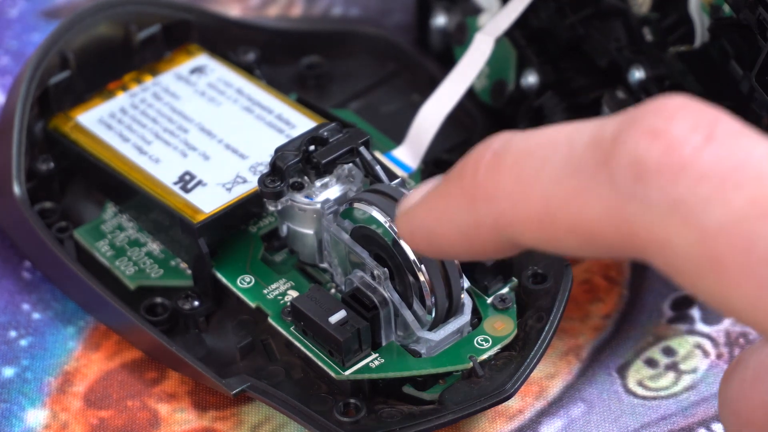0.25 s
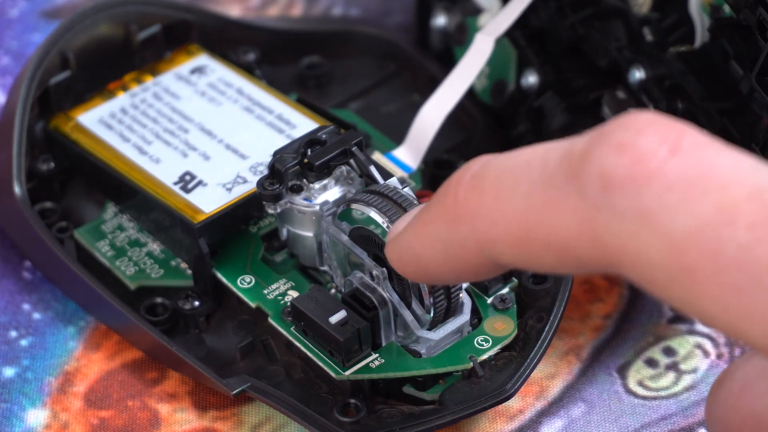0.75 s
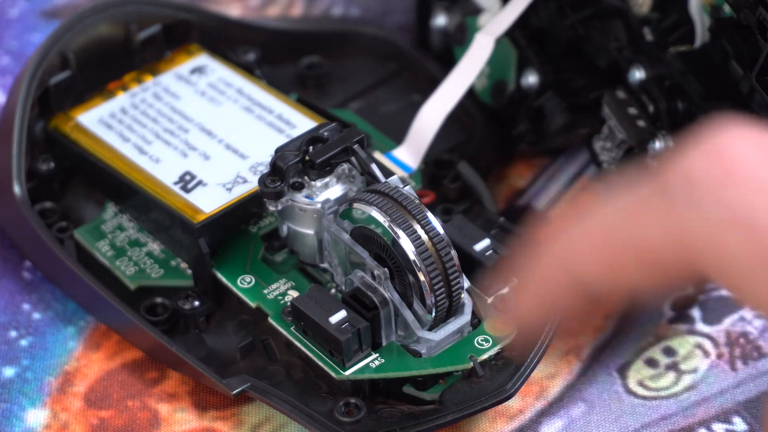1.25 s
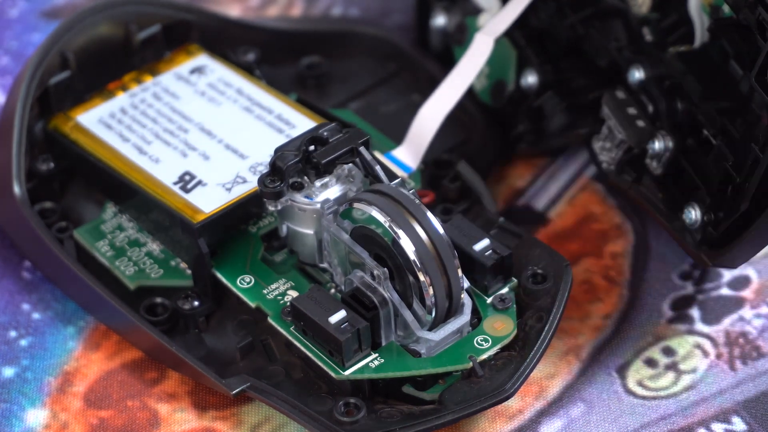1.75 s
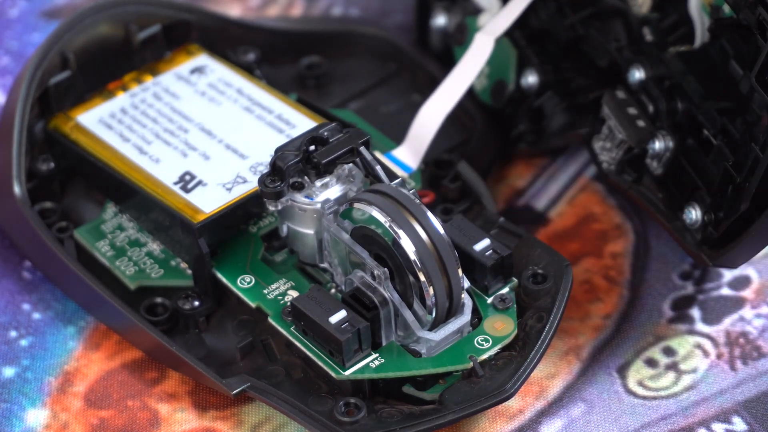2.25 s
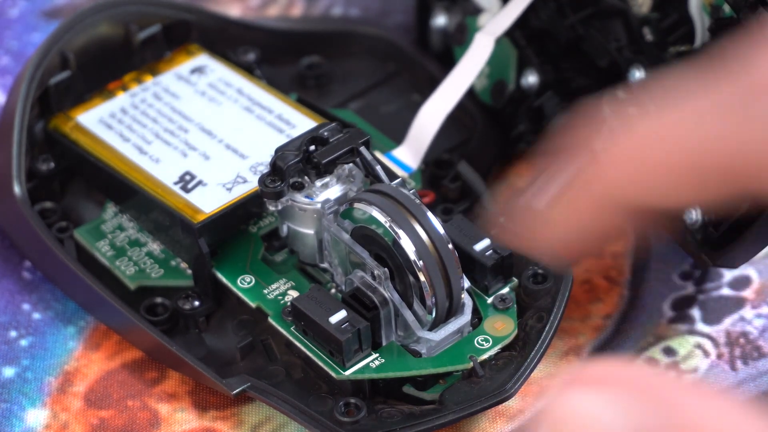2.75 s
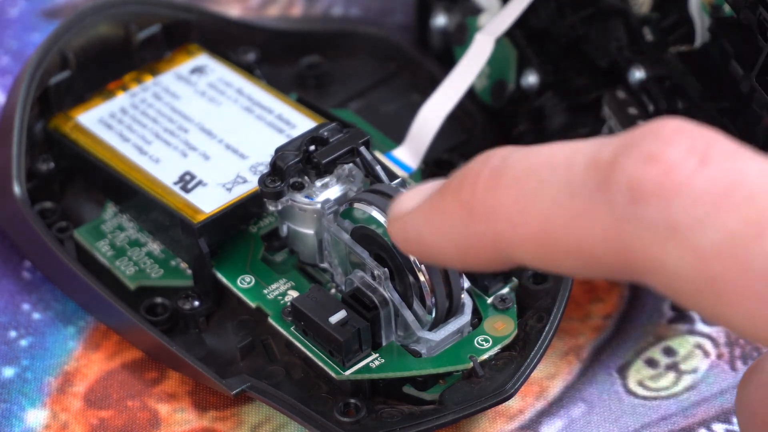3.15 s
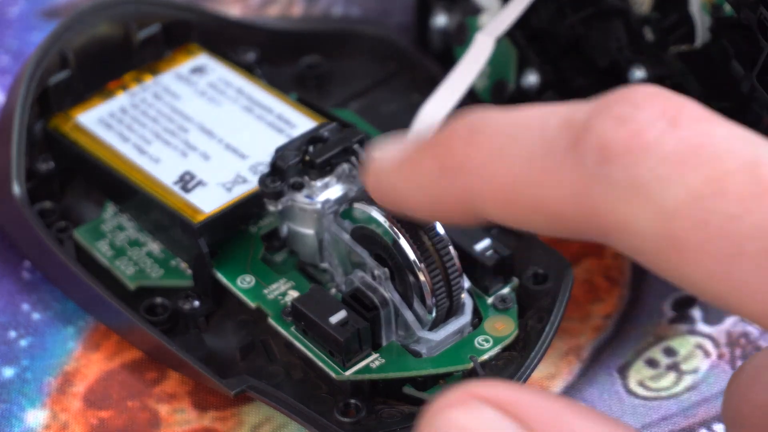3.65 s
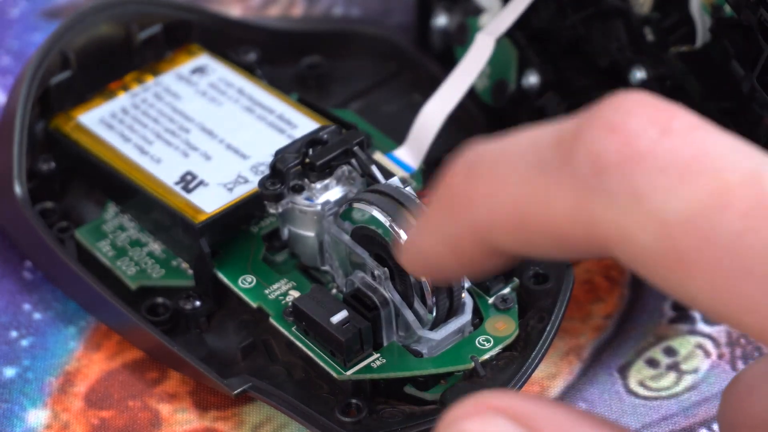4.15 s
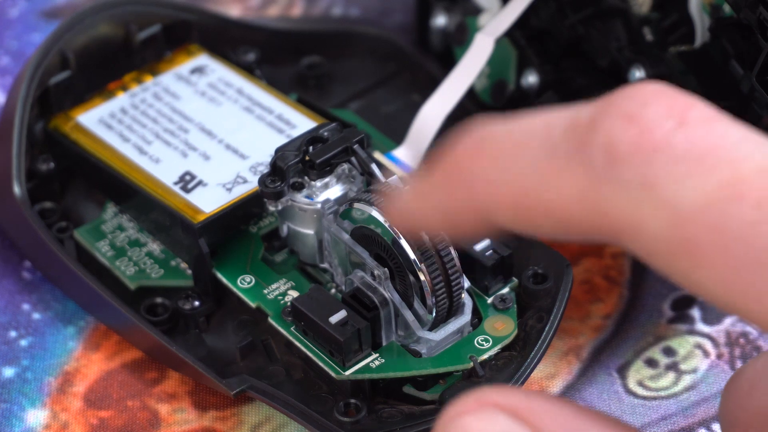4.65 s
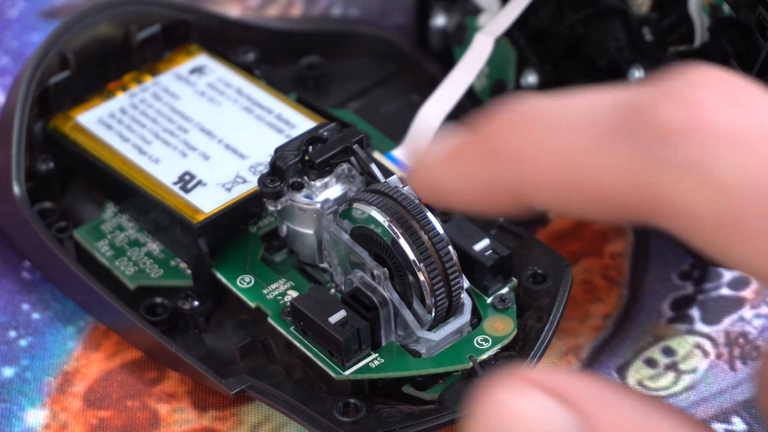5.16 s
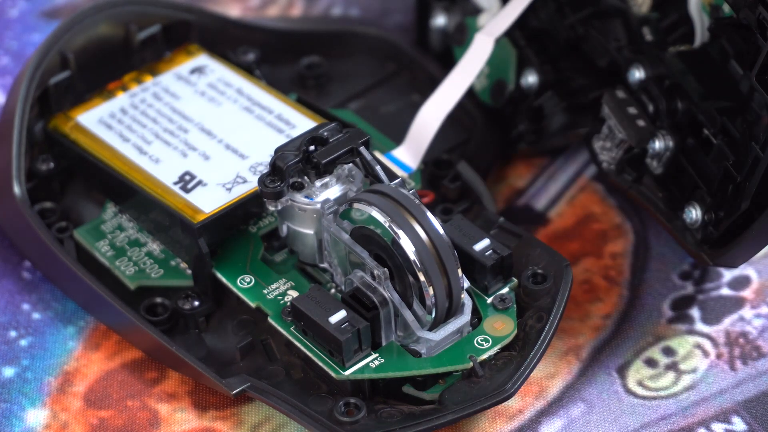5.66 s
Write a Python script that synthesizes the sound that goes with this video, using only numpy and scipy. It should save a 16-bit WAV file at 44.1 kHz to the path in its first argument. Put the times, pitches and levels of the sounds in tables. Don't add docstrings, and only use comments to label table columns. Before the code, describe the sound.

An opened mouse's wheel clicks sharply and unevenly, crisp plastic and metal with a tiny bright ring. Two hard snaps stand out; slow rolls tick in clusters between quick whirring flicks. The moving hand makes low dull bumps on the desk, cloth brushes faintly, and two woody knocks sound farther away. Close miking, small room, quiet hum, fan and hiss.

```python
import sys
import numpy as np
from scipy import signal
from scipy.fft import rfft, irfft
from scipy.io import wavfile

SR = 44100
rng = np.random.default_rng(int(sys.argv[2]) if len(sys.argv) > 2 else 0)


def decibels_to_gain(level_db):
    exponent = np.asarray(level_db, float) / 20
    return 10 ** exponent


def pcm_store(signal):
    levels = np.round(np.clip(np.atleast_2d(signal), -1, 1) * 32767)
    wavfile.write(sys.argv[1], SR, levels.astype(np.int16).T)


N = 261072

LIFT_HZ = 3030


def at_level(x, rms_db):
    return x * decibels_to_gain(rms_db) / np.sqrt(np.mean(x ** 2))


def coloured(spectrum):
    hz, db = np.transpose(spectrum)
    f_hz = np.maximum(np.arange(N // 2 + 1) * SR / N, 1)
    gain = decibels_to_gain(np.interp(np.log(f_hz), np.log(hz), db))
    return irfft(rfft(rng.standard_normal(N)) * gain, N)


def humming(resonances):
    f_hz = np.arange(N // 2 + 1) * SR / N
    noise = rfft(rng.standard_normal(N))
    out = 0
    for hz, width_hz, db in resonances:
        out = out + at_level(irfft(noise / (1 + (2 * (f_hz - hz) / width_hz) ** 2), N), db)
    return out


def ring(modes, count, length_s, scatter_db, detune, favour_hz=None, twist_rad=0):
    t = np.arange(int(length_s * SR)) / SR
    chance = rng.standard_normal((count, len(modes), 3))
    out = 0
    for k, (hz, db, t60_s) in enumerate(modes):
        db = db + scatter_db * chance[:, k, :1] - 60 * t / t60_s
        if favour_hz is not None:
            db = db - np.minimum(4 * ((hz - favour_hz) / 350) ** 2, 15)
        blow_hz = hz * (1 + detune * chance[:, k, 1:2])
        phase = 2 * np.pi * blow_hz * t + twist_rad * chance[:, k, 2:]
        out = out + (-1) ** k * decibels_to_gain(db) * np.sin(phase)
    return out


def place(times_s, sounds):
    out = np.zeros(N + sounds.shape[1])
    for s, sound in zip(times_s, sounds):
        start = int(s * SR)
        out[start:start + len(sound)] += sound
    return out[:N]


def room(x, gap_s, early):
    # (frequency [Hz], t60 [s])
    room_t60 = [(200, 0.26), (1500, 0.68), (3000, 0.63), (6500, 0.62), (11000, 0.32), (16000, 0.022)]
    hz, t60_s = np.transpose(room_t60)
    t = np.arange(SR // 2) / SR
    tail = 0
    for centre_hz in 125 * 2 ** np.arange(0, 7.2, .5):
        edges_hz = [centre_hz * .84, min(centre_hz * 1.19, 20000)]
        band = signal.butter(2, edges_hz, "band", fs=SR, output="sos")
        decay = decibels_to_gain(-60 * t / np.interp(np.log(centre_hz), np.log(hz), t60_s))
        tail = tail + signal.sosfilt(band, rng.standard_normal(len(t))) * decay
    tail = tail * (1 - np.exp(-t / gap_s)) * (1 + early * np.exp(-t / 0.013))
    return signal.fftconvolve(x, tail / np.sqrt(np.sum(tail ** 2)))[:N]


def microphone_hiss():
    # (frequency [Hz], level per Hz [dB])
    hiss_spectrum = [(35, -33), (60, 9), (142, -17), (287, -10), (882, -9), (3120, -10), (6740, -9),
                     (14900, -9), (16000, -17.5)]
    return at_level(coloured(hiss_spectrum), -67.5)


def room_air():
    # (frequency [Hz], level per Hz [dB])
    air_spectrum = [(20, -35), (35, -44), (64, -6), (90, -11.5), (300, -16), (600, -23), (1160, -27),
                    (2200, -30.5), (3500, -28), (4300, -34.5), (6000, -37.5), (10000, -38), (14400, -38),
                    (16000, -40)]
    return at_level(coloured(air_spectrum), -55.5)


def fan():
    # (frequency [Hz], width [Hz], level [dB])
    housing = [(185, 7.7, -67.5), (277.8, 15.4, -60.5), (449.4, 16, -70), (506, 37, -71), (832.5, 14, -75),
               (2153, 8, -76.5)]
    return humming(housing)


def mains_hum():
    # (time [s], level [dB])
    hum_swell = [(0, -66), (.65, -55), (.8, -51.5), (1.5, -49.5), (1.9, -61), (2.1, -59), (2.4, -52.5),
                 (3.3, -50), (3.8, -56.5), (4.3, -57), (4.8, -50), (5.3, -51.5), (5.5, -57), (5.92, -56)]
    t = np.arange(N) / SR
    return np.sqrt(2) * np.sin(2 * np.pi * 61 * t) * decibels_to_gain(np.interp(t, *np.transpose(hum_swell)))


def sleeve_rustle():
    # (time [s], half length [s], level [dB])
    brushes = [
        (2.56, 0.041, -60),
        (1.35, .02, -70),
        (2.205, 0.11, -62.5),
    ]
    t = np.arange(N) / SR
    swell = 0
    for s, half_s, db in brushes:
        swell = swell + decibels_to_gain(db) * np.exp(-((t - s) / half_s) ** 2)
    return swell * at_level(coloured([(1500, -30), (4000, 0), (11000, 0), (15000, -10)]), 0)


def pressure(start_s, held_s, db, fall_db_per_s, rest_db):
    t = np.arange(0, N, 64) / SR
    rise_db = 174 * np.maximum(start_s - t, 0)
    fall_db = fall_db_per_s * np.maximum(t - start_s - held_s, 0)
    strongest_db = (db - rise_db - fall_db).max(axis=0)
    return decibels_to_gain(np.interp(np.arange(N) / SR, t, np.maximum(strongest_db, rest_db)))


def desk():
    # (time [s], held [s], boom level [dB], rattle level [dB])
    presses = [(.26, .03, -52.5, -57.5), (.74, 0.028, -50, -49), (.89, 0.2, -49, -58.5),
               (1.2, .02, -53, -64), (1.599, 0.026, -40, -43.5), (1.8, 0.032, -48.5, -60),
               (2.18, 0.0079, -65, -49.5), (2.93, .05, -46, -49), (3.12, .04, -56, -61),
               (3.4, .03, -56, -55), (3.5, 0.024, -62, -54.5), (3.68, .02, -60, -66),
               (3.9, 0.051, -44, -52.5), (4.2, 0.048, -48, -50), (4.27, 0.018, -43.5, -51),
               (4.5, 0.1, -45, -54), (4.63, .02, -48.5, -60), (4.91, 0.036, -39, -44.5),
               (5.4, 0.038, -44.5, -44)]
    # (frequency [Hz], width [Hz], level [dB])
    boom_modes = [(42.8, 14.6, 0)]
    rattle_modes = [(105, 16, 0), (159.2, 20, -5.5), (226.4, 53, -8.5), (322.5, 39, -9)]
    # (time [s], frequency [Hz], level [dB], t60 [s])
    heel_thumps = [
        (1.008, 378, -43.5, 0.068),
        (1.01, 1070, -50, 0.043),
        (4.994, 750, -45.5, 0.073),
        (0.753, 61.5, -41, 0.11),
        (1.574, 62, -39, 0.13),
        (2.924, 150, -35, 0.038),
        (2.939, 40, -31.5, 0.33),
        (3.44, 60.6, -42, 0.12),
        (5.367, 65, -34, 0.35),
        (5.367, 158.4, -35, 0.11),
    ]
    s, held_s, boom_db, rattle_db = np.transpose(presses)[:, :, None]
    boom_gain = pressure(s + 0.0083, held_s, boom_db, fall_db_per_s=95, rest_db=-63)
    rattle_gain = pressure(s, held_s, rattle_db, fall_db_per_s=140, rest_db=-62.5)
    boom = at_level(humming(boom_modes), 0) * boom_gain
    rattle = at_level(humming(rattle_modes), 0) * rattle_gain

    start_s, hz, db, t60_s = np.transpose(heel_thumps)[:, :, None]
    t = np.arange(SR // 3) / SR
    thumps = np.sin(2 * np.pi * hz * t) * decibels_to_gain(db - 60 * t / t60_s)
    return boom + rattle + place(start_s[:, 0], thumps)


def far_knocks():
    # (time [s], thump level [dB], crack level [dB], thump frequency [Hz], room share [dB])
    knock_blows = [
        (2.1627, -29.5, -34.5, 287, -1.5),
        (2.1640, -25.5, -38, 288, 0),
        (2.169, -38.5, -34.5, 322, -23),
        (2.1726, -42, -37, 444, -9),
        (2.178, -30, -52, 160, -7),
        (2.19, -51, -59, 150, 4),
        (5.8868, -30, -30.5, 324, -2),
        (5.8869, -33, -58, 313, -1),
        (5.89, -57, -32, 330, -16),
        (5.8916, -37.5, -32, 610, -14),
    ]
    # (frequency [Hz], level [dB], t60 [s])
    woody_body = [(72, -15, .1), (474, -8, .02), (625, -14, .015), (800, -12, .012), (1050, -9, .014),
                  (1514, -14, .02)]
    s, thump_db, crack_db, hz, wet_db = np.transpose(knock_blows)[:, :, None]
    t = np.arange(SR // 10) / SR
    thump = np.sin(2 * np.pi * hz * t) * decibels_to_gain(-60 * t / 0.022)
    thump = thump + ring(woody_body, len(s), .1, scatter_db=2.5, detune=0.054)[:, :len(t)]
    thump = thump * decibels_to_gain(thump_db)

    crack = rng.standard_normal((len(s), len(t))) * np.exp(-t / .0006)
    crack[:, 0] += 6
    crack = signal.sosfilt(signal.butter(1, [2000, 4000], "band", fs=SR, output="sos"), crack)
    crack = signal.sosfilt(signal.butter(4, 8000, fs=SR, output="sos"), crack)
    crack = crack / np.sqrt(np.sum(crack ** 2, axis=1, keepdims=True))
    direct = thump + crack * decibels_to_gain(crack_db + 14)
    return place(s[:, 0], direct), place(s[:, 0], (direct - 0.25 * thump) * decibels_to_gain(wet_db))


def blows(s, parts_db, cradle_hz):
    s = np.ravel(s)
    return np.column_stack([s, np.reshape(parts_db, (len(s), -1)), np.ravel(cradle_hz) + 0 * s])


def played(events, pattern):
    s, db, slowness = np.transpose(events)[:, :, None]
    pattern = np.array(pattern)
    return s + slowness * pattern[:, 0], db[:, :, None] + pattern[:, 1:]


def latch_blows():
    # (time [s], level [dB], slowness of the bounces)
    snaps = [
        (.761, -27.5, .92),
        (3.4877, -24, 1.05),
    ]
    # (delay [s], shell [dB], cradle [dB], spring [dB], rim [dB])
    snap_blows = [
        (-.0085, -31, -25, -30, -37),
        (-.003, -16, -18, -17, -18),
        (0, -15.5, 2, -16, 2.5),
        (.0023, -15.5, -0.5, -2.5, -20),
        (0.0102, -10.5, -7.5, -7, -14),
        (0.0133, -19, -9, -6.5, -11),
    ]
    snap_hz, rebound_hz = 2450, 2850
    seat_hz = np.where(np.arange(len(snap_blows)) % 2, rebound_hz, snap_hz)
    return_s, return_db = .0833, [-21, -8, -15.5, -14.5]
    s, db, _ = np.transpose(snaps)
    return np.vstack([blows(*played(snaps, snap_blows), np.tile(seat_hz, len(s))),
                      blows(s + return_s, db[:, None] + return_db, snap_hz)])


def flick_blows():
    # (time [s], level [dB], slowness)
    flicks = [
        (1.573, -32, 1.03),
        (5.3817, -31.5, .97),
    ]
    # (delay [s], shell [dB], cradle [dB], spring [dB], rim [dB])
    flick_teeth = [
        (-.0043, -36, -13.5, -17, -23),
        (0, -9.5, -5.5, -12, -13),
        (.009, -6, -1.5, -10, -7),
        (0.0158, -12, -4, 0.5, 1),
        (.021, -19.5, -1.5, -14, -8.5),
        (.0252, -14, -5, 4.5, 1),
        (.0296, -2.5, -4, -17, -29),
        (.042, -10.5, -7.5, -17, -13),
    ]
    delay_s = np.array(flick_teeth)[:, 0]
    rising_hz = np.where(delay_s < 0, LIFT_HZ, 2400 + 16000 * delay_s)
    return blows(*played(flicks, flick_teeth), np.tile(rising_hz, len(flicks)))


def notch_blows():
    # (time [s], level [dB], cradle share [dB], cradle
    # pitch [Hz])
    notches = [(3.862, -43.5, 3, 2650), (3.888, -45.5, 1, 2500), (3.909, -42, 2, 2570),
               (3.9233, -41.5, 5, 2500), (3.9407, -44, 3, 2400), (3.9802, -49, -8, 3150),
               (3.994, -50.5, 2, 2840), (4.184, -43, 0.5, 2830), (4.2007, -42, 1, 2530),
               (4.2191, -44, 0, 2700), (4.2379, -42.5, -8, 3040), (4.2628, -43.5, -.5, 2600),
               (4.2786, -48, -1, 2780), (4.2918, -52, 5.5, 2840), (4.4837, -43.5, 6, 2500),
               (4.5026, -43, -9, 2470), (4.5209, -41, -2, 2580), (4.541, -44, 5.5, 2500),
               (4.5822, -49, 1.5, 2960), (4.5953, -50, 1, 2590), (4.609, -54, .5, 2850),
               (4.856, -40, 4.5, 2500), (4.8711, -43, 4.5, 2500), (4.8814, -40.5, 7, 2600),
               (4.892, -38.5, 1.5, 2720), (4.905, -42, -3, 2470), (4.927, -42.5, 0.5, 2550),
               (4.965, -46.5, -5, 2640), (4.981, -48.5, 8.5, 2870), (4.9895, -51.5, 2, 2620),
               (5.366, -50.5, -14, 2480), (0.8954, -54.5, -12, 2600), (4.834, -56.5, -17, 2740),
                (0.9153, -46, -5, 2630), (0.9317, -50, 0, 2560), (0.9437, -51, 3, 2500),
                (0.974, -57, -2, 2400), (1.0114, -57.5, 2.5, 2750), (3.6098, -49.5, 0, 3200),
                (3.621, -60, -4, 2700), (3.632, -54, -11, 2700)]
    notch_db = [-4, -1.5, -.5, -3]
    lift_s, lift_db = .0047, [-17, -11.5, -9.5, -17.5]
    firm_db, dulling = -48.5, .6
    s, db, share_db, hz = np.transpose(np.array(notches))
    seated_db = db[:, None] + np.array(notch_db)
    seated_db[:, 1] += share_db
    seated_db[:, 2:] += dulling * np.minimum(db - firm_db, 0)[:, None]
    return np.vstack([blows(s, seated_db, hz), blows(s - lift_s, db[:, None] + lift_db, LIFT_HZ)])


def ping_blows():
    # (time [s], level [dB], cradle pitch [Hz])
    pings = [(.6967, -43.5, 3080), (1.3548, -56, 3340), (3.3843, -43, 3130), (3.3862, -41.5, 3500),
             (3.874, -49, 2870), (3.9466, -42.5, 3730), (3.955, -48, 3400), (4.0058, -47, 2390),
             (4.158, -64, 2710), (4.187, -42, 3140), (4.3046, -57, 2730), (4.3146, -56, 3500),
             (4.437, -49.5, 3350), (4.498, -46, 2540), (4.915, -46, 3630), (4.9396, -56, 2750),
             (4.9455, -64, 3060), (5.0057, -62, 2890), (5.144, -66, 3150), (4.63, -57, 3600),
             (5.434, -40, 3520)]
    ping_db = [-28, -3.5, -15.5, -20]
    s, db, hz = np.transpose(pings)
    return blows(s, db[:, None] + np.array(ping_db), hz)


def wheel():
    # (frequency [Hz], level [dB], t60 [s])
    shell = [(1380, -5, .006), (1560, 0, .007), (1700, -1, .007), (2000, -3, .006)]
    cradle = [(2300, -3, .01), (2520, 0, .014), (2720, -1, .011), (2990, 0, .012), (3250, 0, .01),
              (3700, 0, .011), (4150, -5, .008)]
    spring = [(4700, -10, .006), (5250, -8, .007), (5700, -5, .008), (6150, 0, .01), (6500, -1, .009),
              (7100, -6, .006)]
    rim = [(8370, 1, 0.016), (8620, -8.5, 0.002), (9460, -1.5, 0.0037), (10920, 0.5, 0.0036),
           (13050, -3.5, 0.0018), (13900, -5.5, 0.0026)]
    latch_modes = [(4500, -9, .007), (4960, -2, .011), (5670, -1, .009), (6250, -2, .009), (6600, -4, .007),
                   (7130, -3, .007)]
    mat_modes = [(330, 1.5, 0.13), (477, 2.5, 0.097), (720, 0.6, 0.051), (1064, 1.6, 0.056)]
    # (low edge [Hz], high edge [Hz])
    reach_hz = [(1250, 2400), (2150, 4800), (4000, 8000), (6800, 15500)]
    wall_db = [-3.5, -1, -2, -0.5]
    latch = latch_blows()
    table = np.vstack([latch, flick_blows(), notch_blows(), ping_blows()])
    s, count = table[:, 0], len(table)
    latched = (np.arange(count) < len(latch))[:, None]

    t = np.arange(SR // 100) / SR
    chatter = rng.standard_normal((count, len(t))) * t * np.exp(-t / 0.0009)
    chatter = chatter / np.sqrt(np.sum(chatter ** 2, axis=1, keepdims=True))
    chatter[:, 12] += np.where(latched[:, 0], 1.6, .6)

    near = spread = 0
    for k, part in enumerate((shell, cradle, spring, rim)):
        favour_hz = table[:, 5:] if part is cradle else None
        rings = ring(part, count, .03, scatter_db=2, detune=.015, favour_hz=favour_hz, twist_rad=1)
        if part is spring:
            latch_rings = ring(latch_modes, count, .03, scatter_db=2, detune=.01, twist_rad=1)
            rings = np.where(latched, latch_rings, rings)
        rings[:, 0] += 1.2 if part is cradle else 3
        rings = signal.sosfilt(signal.butter(3, reach_hz[k], "band", fs=SR, output="sos"), rings)
        sound = signal.fftconvolve(chatter, rings, axes=1)
        onset_rms = np.sqrt(np.mean(sound[:, :SR // 300] ** 2, axis=1, keepdims=True))
        sound = sound / onset_rms * decibels_to_gain(table[:, k + 1:k + 2] - 0.5)
        near = near + sound
        rings = rings * np.exp(-np.arange(rings.shape[1]) / SR / .0025)
        energy_ratio = np.sum(sound ** 2, axis=1) / np.sum(rings ** 2, axis=1)
        spread = spread + decibels_to_gain(wall_db[k]) * rings * np.sqrt(energy_ratio)[:, None]

    thud = ring(mat_modes, count, .06, scatter_db=2.5, detune=0.087) * decibels_to_gain(table[:, 1:2] - 16.5)
    return place(s, near) + place(s, thud), place(s, spread)


def scene():
    side = microphone_hiss()
    mid = room_air() + fan() + mains_hum() + sleeve_rustle() + desk()
    far, far_wet = far_knocks()
    mid = mid + far + room(far_wet, gap_s=0.0065, early=.1)
    near, spread = wheel()
    mid = mid + near + decibels_to_gain(-6.5) * room(spread, gap_s=0.0016, early=6.1)
    return np.array([mid + side, mid - side])


def low_pass(x):
    return signal.sosfilt(signal.butter(12, 16640, fs=SR, output="sos"), x)


def record(dry):
    top_cut = signal.ellip(10, .2, 45, 15850, fs=SR, output="sos")
    return low_pass(signal.sosfilt(top_cut, dry))


dry = scene()
out = record(dry)
pcm_store(out)
```